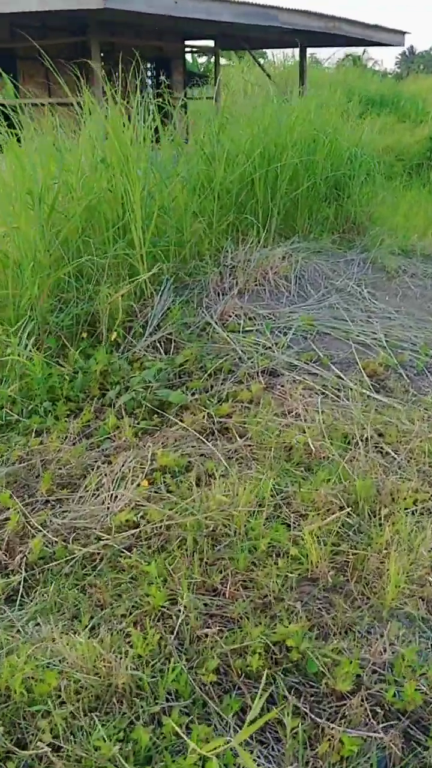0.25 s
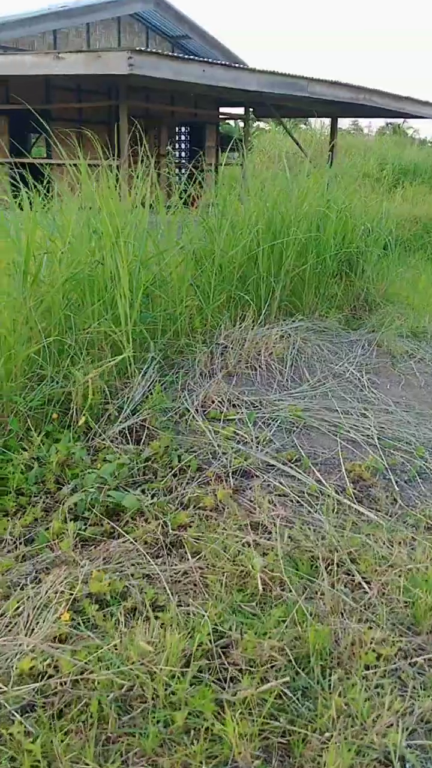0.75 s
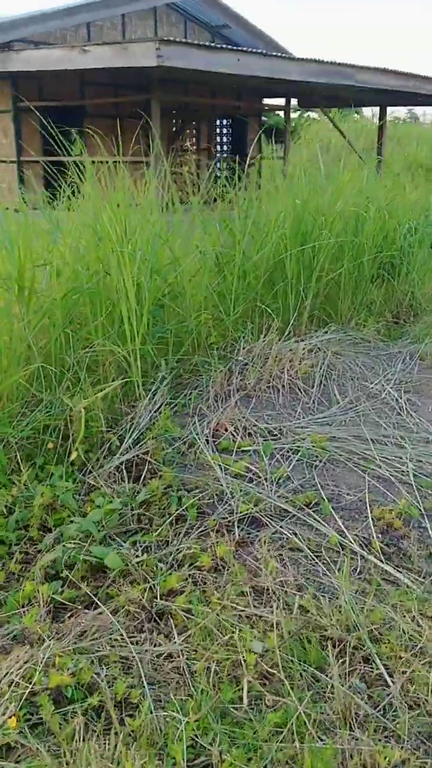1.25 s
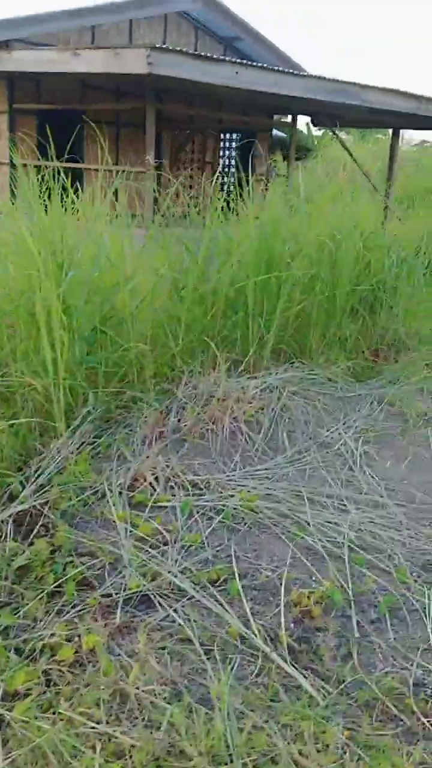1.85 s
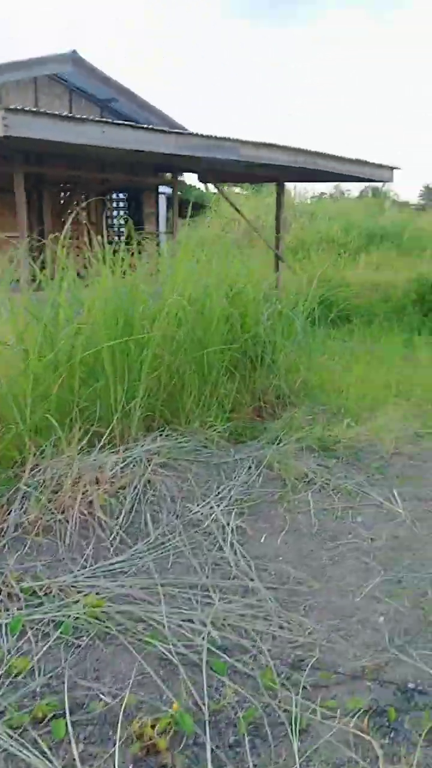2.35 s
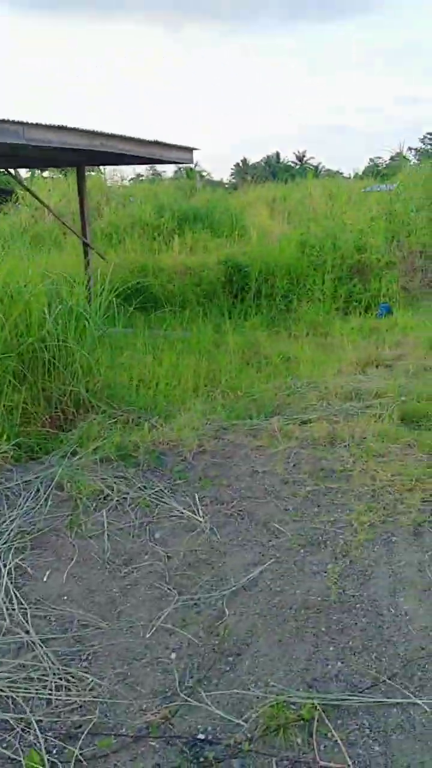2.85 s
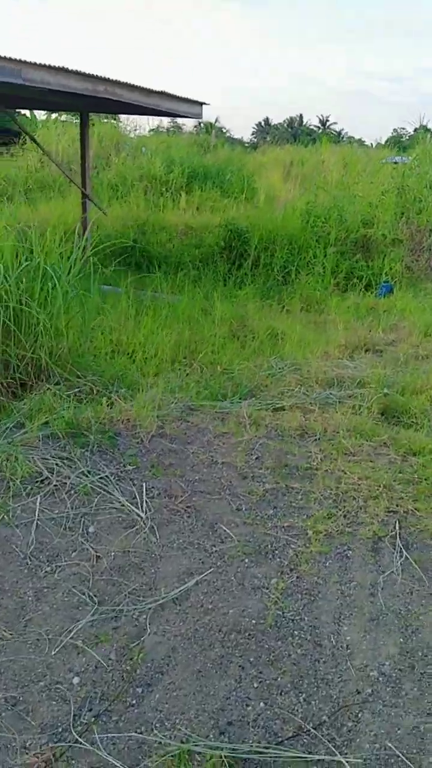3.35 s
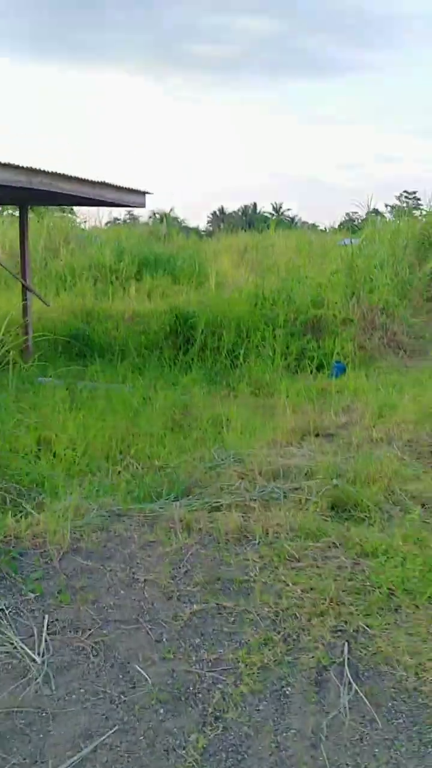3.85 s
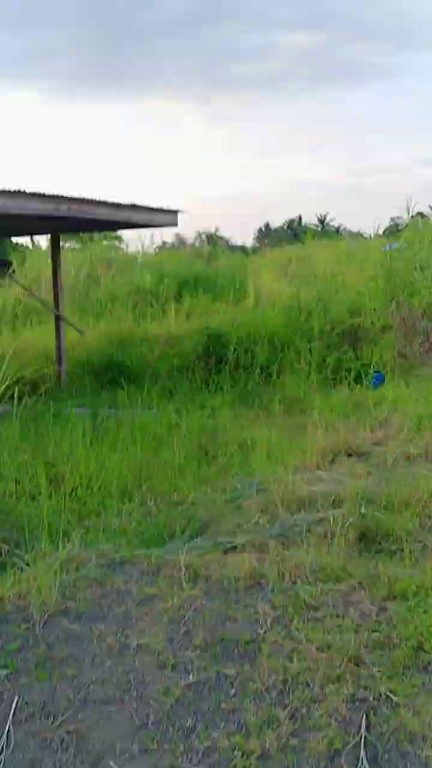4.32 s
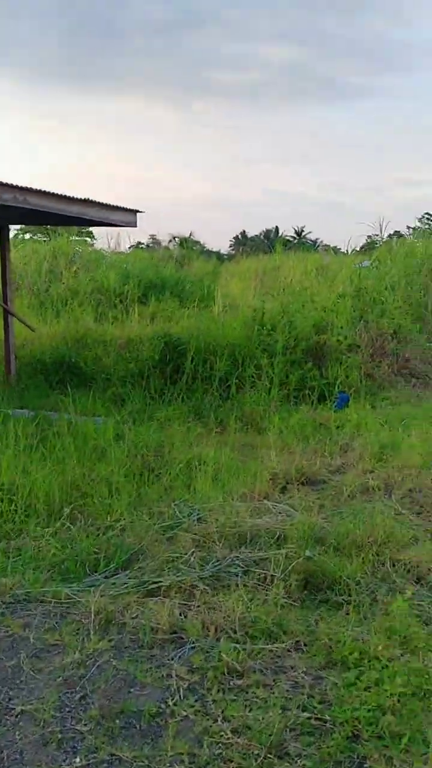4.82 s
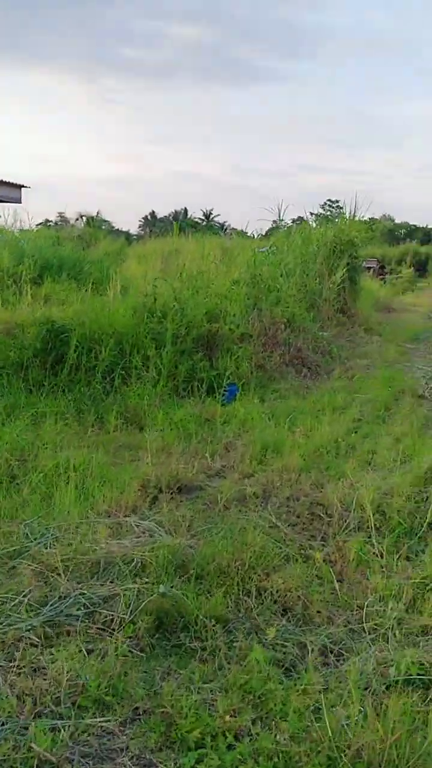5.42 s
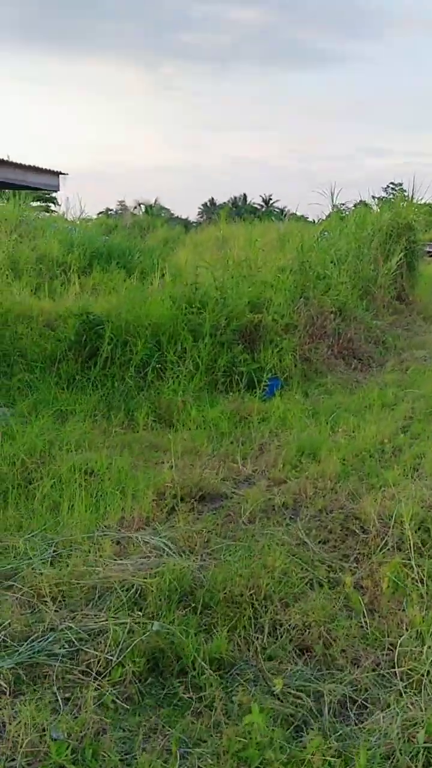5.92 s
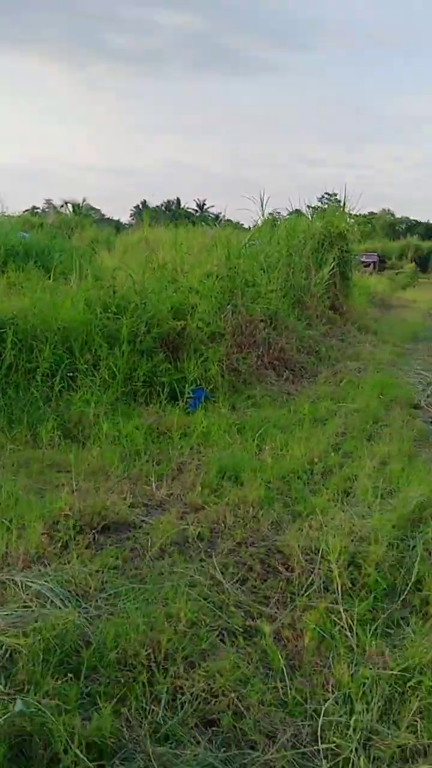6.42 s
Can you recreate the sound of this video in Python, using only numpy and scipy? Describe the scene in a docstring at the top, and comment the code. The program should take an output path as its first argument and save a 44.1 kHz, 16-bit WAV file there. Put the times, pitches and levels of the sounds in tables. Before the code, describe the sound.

Footsteps move through dry grass and over gravel throughout, with rustling, snapping stalks and occasional dull thumps on the handheld microphone. Behind them lie a soft country hush, a low rumble, faint insect trills and scattered bird whistles. At about 1.1 seconds a small bird gives a quick, husky chirp while a distant rooster crows until around 2 seconds. A heavier thump comes near 3 seconds. From 3.5 to 5.1 seconds a nearby rooster crows: two short syllables, a rough strained stretch, then a clear held note that sinks slightly. A second, higher rooster with more echo overlaps it until 4.9 seconds, as the stalks crack louder underfoot. Faint crows answer from far off between 5.2 and 5.8 seconds. One sharp click sounds right by the microphone at 5.5 seconds, and a chick peeps softly four times between 5.4 and 6.3 seconds as the steps continue.

```python
"""A grassy yard: a rooster crows, a second one overlaps it and others answer from far off.
Each crow is a buzz from the bird's voice box, made rough by strain and rasping air.
Someone walks through dry grass and over gravel with a phone: stalks crackle and snap, and
footfalls thump in the hand. Small birds whistle, a chick peeps and insects buzz with their wings
over a quiet country background."""
import sys
import numpy as np
from scipy import signal
from scipy.fft import rfft, irfft
from scipy.io import wavfile
from scipy.ndimage import uniform_filter1d

SR = 44100
rng = np.random.default_rng(int(sys.argv[2]) if len(sys.argv) > 2 else 0)


def waveform_to_disk(signal):
    """Save audio, clipped to [-1, 1], as 16-bit WAV at the path in sys.argv[1]."""
    frames = np.transpose(np.atleast_2d(signal))
    scaled = np.clip(frames, -1, 1) * 32767
    samples = np.round(scaled).astype(np.int16)
    wavfile.write(sys.argv[1], SR, samples)


N = 294147
T = np.arange(N) / SR

# Tone of air rasping through a strained throat: f/Hz, gain/dB
RASP_TONE = [(400, -28.5), (750, -10.5), (1000, -1.5), (1450, -9), (1750, 6), (2200, -2.5), (2700, -18.5),
             (3200, -0.5), (3550, -21), (4100, -33.5), (8000, -33.5)]
def crow(syllables, throat, jitter, shimmer, doubling, tremor, throb, flutter_hz, rasp_db):
    """The voice box buzzes; under strain its beats turn uneven and air rasps through."""
    voice, air = np.zeros(N), np.zeros(N)
    for start, hz, db, lift_db, rough in syllables:
        size, lift = len(hz), undb(lift_db)
        gain = edges(size, edge_s=0.012) * undb(db) / np.hypot(1, lift)
        # a hard-driven throat shakes a few dozen times a second, in pitch and in strength
        shake = np.sin(phase_of(38 * (1 + 0.21 * wander(19, size))))
        wobble = jitter * wander(flutter_hz, size) + tremor * shake
        phase = phase_of(hz * (1 + rough * wobble))
        overtones = sum(np.sin(k * phase) for k in range(2, 8))
        buzz = np.sqrt(2) * (np.sin(phase) + lift * overtones)
        # strong and weak beats take turns, adding blurred tones between the overtones
        alternation = doubling * rough ** 2 * wander(116, size) * np.sin(phase / 2)
        swell = 1 + rough * (shimmer * wander(flutter_hz, size) + throb * shake) + alternation
        add(voice, start, gain * swell * buzz)
        puffs = rng.standard_normal(size) * (1 + 0.7 * np.cos(phase))
        add(air, start, gain * lift * undb(rasp_db) * rough ** 1.56 * puffs)
    return colour(voice, throat) + colour(air, RASP_TONE)


# Short syllables: start t/s, crest t/s, end t/s, start f/Hz, crest f/Hz, end f/Hz, level/dB,
# overtone lift from the open beak/dB, roughness/0-1
NEAR_SYLLABLES = [(3.505, 3.58, 3.64, 690, 832.6, 814, -32, 5, 0.7),
                  (3.75, 3.806, 3.876, 810, 1000, 770, -25, 1, .22),
                  (4.35, 4.58, 4.63, 862, 861, 800, -40, 28, 0.44)]
# The long strained syllable and the clear last note: t/s, f/Hz, level/dB
STRAINED_CURVE = [(3.92, 707, -41), (3.95, 746, -39), (3.976, 876.1, -38), (4.086, 897, -27.5),
                  (4.136, 946, -27.5), (4.174, 952.9, -27), (4.272, 861, -29.5), (4.304, 864, -35),
                  (4.34, 799.1, -29)]
HELD_CURVE = [(4.62, 841.3, -32.5), (4.692, 820, -27.5), (4.822, 817, -29), (5.066, 799, -33),
              (5.115, 769.6, -39.5)]
# How the throat and the trip through the air shape the tone: f/Hz, gain/dB
THROAT_TONE = [(300, -15), (600, -40), (720, 2), (1200, -3), (1400, 2.5), (1620, 0.5), (1980, -0.5),
               (2200, -9.5), (2450, -21.5), (2900, -17.5), (3350, -23.5), (3800, -36), (5000, -56),
               (8000, -70)]
def near_rooster():
    """A close crow: short syllables, a strained stretch and a clear held note."""
    syllables = syllables_of(NEAR_SYLLABLES, bend=1.796, sag_db=14)
    syllables.append(long_syllable(STRAINED_CURVE, lift_db=2.5, rough=0.43))
    syllables.append(long_syllable(HELD_CURVE, lift_db=17, rough=0.06))
    voice = crow(syllables, THROAT_TONE, jitter=0.059, shimmer=0.29, doubling=0.41,
                 tremor=0.04, throb=0.76, flutter_hz=400, rasp_db=10)
    return outdoors(voice, wet_db=-15, t60=0.25)


# The second rooster's syllables: columns as in NEAR_SYLLABLES
SECOND_SYLLABLES = [(3.53, 3.6, 3.9, 1160, 1195, 1085, -38, 3, 0.38),
                    (3.85, 3.89, 4.21, 1100, 1133, 1290, -35.5, 6.5, 0.32),
                    (4.2, 4.3, 4.33, 1020, 1141, 1181, -32, -3, 0.33),
                    (4.43, 4.54, 4.64, 1185, 1189, 1118, -38, 2, 0.39),
                    (4.63, 4.83, 4.9, 1085, 1100, 1050, -37.5, 4.5, 0.082)]
def second_rooster():
    """A higher crow with more echo, overlapping the first."""
    syllables = syllables_of(SECOND_SYLLABLES, bend=1.43, sag_db=7)
    voice = crow(syllables, THROAT_TONE, jitter=0.058, shimmer=1.0, doubling=0.28,
                 tremor=0.012, throb=0.25, flutter_hz=230, rasp_db=21)
    return outdoors(voice, wet_db=-4.5, t60=0.43)


# The far roosters' syllables: columns as in NEAR_SYLLABLES
FAR_SYLLABLES = [(1.13, 1.26, 1.453, 839, 857, 1016, -42, 12, .12),
                 (1.44, 1.46, 1.485, 790, 845, 870, -42, 14, .3),
                 (1.47, 1.5, 1.62, 815, 840, 965, -49, 9, .2),
                 (1.6, 1.72, 1.915, 886, 803, 796, -53.5, -20, 0.24),
                 (2.25, 2.36, 2.55, 855, 828, 814, -58, -4, .2),
                 (5.15, 5.22, 5.3, 795, 846, 860, -57.5, -4, 0.28),
                 (5.46, 5.74, 5.75, 1017, 1195, 1241, -54.5, -1, 0.32)]
# How their throats and the long trip shape the tone: f/Hz, gain/dB
FAR_TONE = [(300, -59), (600, -6), (780, 0.5), (1300, 4.5), (1750, -1.5), (2150, -16.5), (2600, 3),
            (2900, -17), (3400, -79), (5000, -27), (8000, -73)]
def far_roosters():
    """Faint, hoarse crows from far off."""
    syllables = syllables_of(FAR_SYLLABLES, bend=1.4, sag_db=2.5)
    voice = crow(syllables, FAR_TONE, jitter=0.048, shimmer=1.0, doubling=0.83,
                 tremor=0.0073, throb=0.94, flutter_hz=250, rasp_db=27.5)
    return outdoors(voice, wet_db=-9, t60=0.35)


# Tone of dry stalks: f/Hz, gain/dB
STALK_TONE = [(180, -42), (300, -9), (527, -9.5), (1090, 0.5), (1360, 1), (1770, 1.5), (2120, -4),
              (2960, 2), (4190, -18), (5290, -9), (6240, -15.5), (8270, -9), (9770, -23.5), (15000, -8.5),
              (15800, -26)]
def stalk_sound(push, bright_push):
    """Breaks make dry stalks ring; the treble gets a push of its own."""
    low = signal.sosfilt(signal.butter(2, 5000, fs=SR, output="sos"), push)
    high = signal.sosfilt(signal.butter(2, 5000, "high", fs=SR, output="sos"), bright_push)
    return colour(low - high, STALK_TONE)


# Steps in the grass: t/s, landing crunch/dB, brushing/dB, treble/dB, ticking/dB
FOOTSTEPS = [(.4, -70, -49.5, -19, -66), (0.917, -38, -57, 7.5, -58.5), (1.678, -65, -44, -8, -53.5),
             (2.142, -46, -51.5, 0.5, -68), (2.243, -32, -48, -1, -79), (2.941, -37, -49, -2.5, -82),
             (3.13, -45.5, -50.5, -33, -85), (3.701, -31.5, -59, -2.5, -69),
             (4.351, -29.5, -38.5, -13.5, -57), (4.962, -66, -41.5, 1, -55), (5.648, -68, -48.5, -1.5, -54),
             (6.211, -42.5, -72, -6, -53.5)]
def grass():
    """Each foot brushes through the grass and lands, breaking a swarm of tiny fibres."""
    swell, bright = np.zeros(N), np.zeros(N)
    tufts = undb(3.3 * wander(28))  # the foot meets the grass unevenly
    for s, crunch_db, brush_db, treble_db, _ in FOOTSTEPS:
        crunch = undb(crunch_db) * surge(s, rise_s=0.021, fall_s=0.03)
        brush = undb(brush_db) * surge(s, rise_s=0.18, fall_s=0.16) * tufts
        swell += crunch + brush
        bright += (crunch + brush) * undb(treble_db)
    tap = signal.unit_impulse(2048)
    fibres = unit(crackle(per_s=2600, spread_db=4, cap=4)) / np.linalg.norm(stalk_sound(tap, tap))
    return stalk_sound(fibres * swell, fibres * bright)


# The loudest snaps: t/s, peak level/dB, treble/dB
LOUD_SNAPS = [(.958, -31.5, 0), (1.001, -28.5, 1), (1.363, -27, -21), (1.69, -23.5, -6), (2.072, -38, 2),
              (2.101, -34, -15), (2.239, -20, -11), (2.248, -25.5, -13), (2.638, -35, -22),
              (2.943, -20.5, -20), (2.986, -31.5, -29), (3.02, -23, -29), (3.331, -36, -8),
              (3.782, -24.5, -2), (3.939, -17.5, -7), (4.084, -28.5, 6), (4.208, -25, 0),
              (4.337, -16.5, -17), (4.548, -27.5, 0), (4.853, -22.5, -5), (4.913, -21.5, 1),
              (4.967, -23.5, -1), (5.65, -27.5, 21), (5.699, -32, 21), (5.772, -30, 16), (6.198, -29, -12)]
def snaps():
    """Single stalks and pebbles give a short, sharp crack."""
    out, t = np.zeros(N), T[:2048]
    for s, db, treble_db in LOUD_SNAPS:
        crack = rng.standard_normal(len(t)) * fade(t, 0.0042)
        snap = stalk_sound(crack, crack * undb(treble_db))
        add(out, s, undb(db) * snap / np.abs(snap).max())
    return out


def ticking():
    """Blades of grass spring back around each step with tiny, very bright ticks."""
    flicks, t = crackle(per_s=160, spread_db=4.5, cap=3.5), T[:SR // 50]
    ticks = signal.fftconvolve(flicks, rng.standard_normal(len(t)) * fade(t, 0.009))[:N]
    ticks = colour(ticks, [(500, -26), (3000, -10), (4200, -22), (6000, -17),
                           (10000, -13), (13000, -2), (15500, 0)])
    swell = sum(undb(db) * surge(s, rise_s=0.76, fall_s=0.33) for s, *_, db in FOOTSTEPS)
    return unit(ticks) * undb(3.6 * wander(9.7)) * swell


# The tones in one click: f/Hz, relative level/dB, ring time/s
CLICK_TONES = [(1360, -5.5, 0.0059), (2667, 6.5, 0.0043), (3040, 2.5, 0.0076), (5540, 2, 0.0031),
               (7770, -14, 0.011)]
def click():
    """A small hard contact right by the phone rings for a few milliseconds."""
    out, t = np.zeros(N), T[:SR // 20]
    ring = sum(undb(db) * np.sin(2 * np.pi * hz * t) * fade(t, t60) for hz, db, t60 in CLICK_TONES)
    ring *= np.minimum(t / 0.00044, 1)
    add(out, 5.5417, undb(-7.5) * ring / np.abs(ring).max())
    return outdoors(out, wet_db=-18, t60=0.38)


# Footfalls felt in the hand: t/s, thump level/dB, ring time/s, knock against thump/dB
FOOTFALLS = [(0.504, -22.5, 0.089, -48), (0.761, -28.5, 0.053, -40), (2.369, -36, 0.13, -31),
             (2.699, -33, 0.1, -26), (3.069, -17, 0.068, -14), (3.122, -31.5, 0.5, -7.5),
             (3.506, -40.5, 0.14, -0.5), (4.171, -35, 0.27, -32), (4.273, -32, 0.18, -37),
             (4.751, -25, 0.11, -14), (6.294, -52.5, 0.049, 3.5), (6.619, -32, 0.22, -41)]
# Low tones of the hand-held phone: f/Hz, relative level/dB, share of the ring time/0-1
BODY_TONES = [(89, 11, 0.56), (118.6, 5.5, 1), (176.3, -1, 0.83)]
def thumps():
    """Footfalls shake the hand and the phone: a low ring with a dull knock."""
    out, t = np.zeros(N), T[:SR // 2]
    knock_tone = [(100, -5.5), (380, -2.5), (650, -19), (1000, -7), (1600, -32), (5000, -50)]
    for s, db, ring_s, knock_db in FOOTFALLS:
        body = sum(undb(tone_db) * np.sin(2 * np.pi * hz * t) * fade(t, ring_s * share)
                   for hz, tone_db, share in BODY_TONES)
        body *= np.minimum(t / 0.014, 1) ** 2
        knock = unit(colour(rng.standard_normal(len(t)), knock_tone))
        knock *= undb(knock_db) * np.minimum(t / 0.0039, 1) * fade(t, 0.19)
        add(out, s, undb(db) * (body / np.abs(body).max() + knock))
    return out


# Notes of a scolding call and a thin "tsip", timed from the highest note:
# start t/s, crest t/s, end t/s, start f/Hz, crest f/Hz, end f/Hz, level/dB
SCOLD_SHAPE = [(-.043, -.025, -.012, 3700, 3200, 2700, -9), (-.018, 0, .011, 2900, 5300, 3700, -5),
               (.008, .017, .035, 3600, 4050, 2650, 1), (.031, .052, .083, 2400, 3020, 2550, -1)]
TSIP_SHAPE = [(-.02, 0, 0.016, 4250, 5390, 5120, 0.81), (0.033, 0.046, 0.068, 3630, 3990, 4300, -3.7)]
# One rising whistle over the first scold: same columns, timed from the start of the scene
RISING_NOTE = (1.168, 1.192, 1.226, 2700, 3560, 4400, -25)
# When each call comes: t/s, level/dB
SCOLD_TIMES = [(1.142, -29), (4.302, -36)]
TSIP_TIMES = [(1.603, -43), (2.903, -46), (4.603, -50.5)]
def near_bird():
    """Quick whistled chirps, husky where the pitch slides fastest."""
    tone, husk = np.zeros(N), np.zeros(N)
    notes = calls(SCOLD_TIMES, SCOLD_SHAPE, bend=1.5, sag_db=2.5)
    notes += calls(TSIP_TIMES, TSIP_SHAPE, bend=1.33, sag_db=6)
    notes.append(arch(RISING_NOTE, bend=0.99, sag_db=28))
    for start, hz, db in notes:
        gate = edges(len(hz), edge_s=0.005)
        add(tone, start, whistle(gate, hz, db, waver=0.025, overtone_db=-28))
        slide = uniform_filter1d(np.abs(np.gradient(np.log(hz))) * SR, SR // 60)
        huskiness = undb(db - 4) * np.minimum(slide / 60, 1)
        add(husk, start, gate * huskiness * rng.standard_normal(len(db)))
    husk = colour(husk, [(1500, 2), (2600, 17.5), (3300, 25), (4300, 8),
                         (5300, 11.5), (7000, -5), (12000, -4.5), (15000, -27)])
    return outdoors(tone + husk, wet_db=-20, t60=0.17)


# Sliding calls: t/s, length/s, start f/Hz, end f/Hz, level/dB
SLIDING_CALLS = [(.01, 0.06, 2894, 2310, -41.5), (0.286, 0.046, 2590, 2056, -48.5),
                 (0.591, 0.052, 4220, 2190, -48.5), (.924, .041, 1253, 963, -46.5),
                 (1.296, 0.049, 5170, 4500, -59), (1.34, 0.043, 4480, 5370, -58),
                 (1.96, 0.061, 3950, 2690, -49.5), (3.172, 0.063, 4170, 2570, -55),
                 (5.348, 0.064, 2440, 2690, -54.5), (5.795, 0.043, 2160, 2310, -44.5),
                 (6.005, 0.035, 2540, 1770, -43.5), (6.457, 0.042, 2400, 1950, -58),
                 (6.501, 0.033, 1426, 1275, -52.5)]
def sliding_birds():
    """Blurred whistles from further off, most of them falling."""
    out = np.zeros(N)
    for s, length, first_hz, last_hz, db in SLIDING_CALLS:
        progress = np.linspace(0, 1, int(length * SR))
        hz = first_hz + (last_hz - first_hz) * progress
        add(out, s, whistle(np.sin(np.pi * progress), hz, db, waver=0.056, overtone_db=-29))
    return outdoors(out, wet_db=-7.5, t60=0.072)


# The one note of a peep: columns as in SCOLD_SHAPE, timed from its start
PEEP_SHAPE = [(0, .028, .11, 3440, 3590, 2850, 0)]
# When the chick peeps: t/s, level/dB
PEEP_TIMES = [(-.02, -46.5), (5.415, -50), (5.661, -47.5), (5.922, -48), (6.187, -47)]
def chick():
    """Peeps that rise and fall, never quite alike, with a faint tone an octave below."""
    out = np.zeros(N)
    for s, hz, db in calls(PEEP_TIMES, PEEP_SHAPE, bend=1.9, sag_db=-1.5):
        gate = edges(len(hz), edge_s=0.0058)
        hz = hz * (1 + 0.008 * wander(40, len(hz)))
        db = db + 2 * wander(60.5, len(hz))
        add(out, s, whistle(gate, hz, db, waver=0.0094, overtone_db=-32))
        add(out, s, whistle(gate, hz / 2, db - 14, waver=0.01, overtone_db=-40))
    return outdoors(out, wet_db=-8.5, t60=0.78)


def distant_birds(count=14, length_s=0.081, middle_hz=2486):
    """Faint whistles glide up or down at random moments, blurred by distance."""
    out, progress = np.zeros(N), np.linspace(0, 1, int(length_s * SR))
    for when, pitch, glide in rng.random((count, 3)):
        hz = middle_hz * 2 ** (0.6 * (pitch - 0.5) + 0.382 * (glide - 0.5) * progress)
        call = whistle(np.sin(np.pi * progress), hz, db=-55, waver=0.017, overtone_db=-29)
        add(out, when * N / SR, call)
    return outdoors(out, wet_db=-3, t60=0.2)


# How the rumble swells and sinks: t/s, relative level/dB
RUMBLE_LEVELS = [(0, -48), (.8, -44.5), (1.25, -51.5), (1.9, -55.5), (2.28, -51.5), (2.9, -54),
                 (4.25, -53.5), (4.9, -52), (5.2, -53.5), (6.35, -61), (6.67, -44)]
# Its tone: f/Hz, gain/dB
RUMBLE_TONE = [(25, -8), (45, -47), (70, -13), (100, -1.5), (135, -1), (200, -8), (300, -19.5),
               (600, -46.5), (1500, -65)]
def rumble():
    """The hand and the moving air make a soft rumble on the microphone."""
    noise = unit(colour(rng.standard_normal(N), RUMBLE_TONE))
    db = np.interp(T, *np.transpose(RUMBLE_LEVELS)) + 1
    return noise * undb(db + 2.95 * wander(24))


# Insect choruses: f/Hz, width/Hz, level/dB, throb rate/Hz, throb depth/0-1
CHORUSES = [(7620, 670, -71.5, 15, 0.76), (8200, 480, -68.5, 5.5, 0.17), (11320, 880, -68.5, 100, 0)]
def insect_choruses():
    """Many tiny wing strokes blur into narrow bands of throbbing hiss."""
    out = np.zeros(N)
    for hz, width, db, rate, depth in CHORUSES:
        throb = 1 + depth * np.sin(phase_of(rate * (1 + 0.098 * wander(25))))
        soften = signal.butter(2, width / 2, fs=SR, output="sos")
        blur = signal.sosfilt(soften, rng.standard_normal(N) + 1j * rng.standard_normal(N))
        hiss = unit(np.real(blur * np.exp(2j * np.pi * hz * T)))  # moved up to the insects' pitch
        out += hiss * throb * undb(db + 1.5 * wander(4))
    return out


# Spells of trilling (silent if the end comes before the start): start t/s, end t/s
TRILL_SPELLS = [(.14, 0.62), (.9, 1.6), (2.1, 2.7), (3.7, 4.7), (5.102, 5.82), (6.4, 5.9)]
def insect_trill():
    """One nearer insect: each wing stroke slows as it closes, so its tone falls."""
    gate = sum(np.clip(np.minimum(T - start, end - T) / 0.02, 0, 1) for start, end in TRILL_SPELLS)
    strokes_per_s = 36 * (1 + 0.023 * wander(3.4))
    stroke = (np.cumsum(strokes_per_s) / SR) % 1
    hz = 7050 - 330 * stroke
    return gate * whistle(np.sin(np.pi * stroke), hz, db=-66.5, waver=0.0152, overtone_db=-40)


# Tone of the countryside: f/Hz, gain/dB
COUNTRY_TONE = [(150, 7.5), (400, 0), (700, 1.5), (1200, 0), (1800, -2), (2500, 4.5), (3400, -5),
                (4200, -18.5), (6000, -17.5), (9800, -24), (13000, -38), (15700, -9)]
def countryside():
    """Distant leaves and birds blend into a soft wash."""
    return unit(colour(rng.standard_normal(N), COUNTRY_TONE)) * undb(-55 + 0.09 * wander(6.7))


def outdoors(x, wet_db, t60):
    """Bushes and house walls scatter a short echo, wet_db louder than the sound itself."""
    t = T[:SR // 2]
    tail = rng.standard_normal(len(t)) * fade(t, t60) * np.minimum(t / 0.025, 1)
    return x + undb(wet_db) * signal.fftconvolve(x, tail / np.linalg.norm(tail))[:N]


def whistle(gate, hz, db, waver, overtone_db):
    """A nearly pure, slightly unsteady tone."""
    phase = phase_of(hz * (1 + waver * wander(895, len(hz))))
    return np.sqrt(2) * gate * undb(db) * (np.sin(phase) + undb(overtone_db) * np.sin(2 * phase))


def crackle(per_s, spread_db, cap):
    """Tiny pops at random moments, most weak and a few strong."""
    sizes = undb(spread_db * np.minimum(rng.exponential(size=N), cap))
    return sizes * rng.choice([-1, 1], N) * (rng.random(N) < per_s / SR)


def arch(note, bend, sag_db):
    """A note with one crest of effort: away from it the pitch bends and the level drops by sag_db."""
    start, crest, end, start_hz, crest_hz, end_hz, db = note
    t = np.arange(start, max(end, start + 0.005), 1 / SR)
    slack = np.interp(t, np.sort([start, crest, end]), [1, 0, 1])
    edge_hz = np.where(t < crest, start_hz, end_hz)
    return start, crest_hz + (edge_hz - crest_hz) * slack ** bend, db - sag_db * slack ** 2


def calls(times, notes, bend, sag_db):
    """The same arched notes, repeated at each time and level."""
    shapes = [arch(note, bend, sag_db) for note in notes]
    return [(s + start, hz, db + call_db) for s, call_db in times for start, hz, db in shapes]


def syllables_of(rows, bend, sag_db):
    """Arched crow syllables, each with its overtone lift and roughness."""
    return [(*arch(note, bend, sag_db), lift_db, rough) for *note, lift_db, rough in rows]


def long_syllable(curve, lift_db, rough):
    """A crow syllable whose pitch and level follow a curve."""
    s, hz, db = np.transpose(curve)
    t = np.arange(s[0], s[-1], 1 / SR)
    return s[0], np.interp(t, s, hz), np.interp(t, s, db), lift_db, rough


def colour(x, points):
    """Shape the tone of x along (f/Hz, gain/dB) points."""
    hz, db = np.transpose(points)
    size = 4096
    f = np.maximum(np.fft.rfftfreq(size, 1 / SR), 1)
    gain = undb(np.interp(np.log(f), np.log(hz), db))
    # make the filter ring only after a sound, never before it
    cepstrum = irfft(np.log(gain))
    cepstrum[1:size // 2] *= 2
    cepstrum[size // 2 + 1:] = 0
    return signal.fftconvolve(x, irfft(np.exp(rfft(cepstrum))))[:len(x)]


def wander(rate, size=N):
    """A random drift of about 1 either way that changes rate times a second."""
    place = np.arange(size) * rate / SR
    count = size // 4 + 2
    return unit(np.interp(place, np.arange(count), rng.standard_normal(count)))


def edges(size, edge_s):
    """Fade in, hold and fade out."""
    t = np.arange(size) / SR
    return np.sin(np.pi / 2 * np.clip(np.minimum(t, t[-1] - t) / edge_s, 0, 1))


def surge(s, rise_s, fall_s):
    """Climb to 1 at time s and die away, by 20 dB every rise_s or fall_s."""
    return undb(-20 * np.minimum(np.maximum((s - T) / rise_s, (T - s) / fall_s), 10))


def fade(t, t60):
    """Die away by 60 dB in t60 seconds."""
    return np.exp(-np.log(1000) * t / t60)


def phase_of(hz):
    """How far a wave has turned, in radians."""
    return 2 * np.pi * np.cumsum(hz) / SR


def undb(db):
    """Turn decibels into a plain gain."""
    return 10 ** (np.asarray(db) / 20)


def unit(x):
    """Scale to an average strength (rms) of 1."""
    return x / np.sqrt(np.mean(x ** 2) + 1e-18)


def add(out, s, x):
    """Mix x in at time s."""
    i = int(round(s * SR))
    x, i = x[max(-i, 0):], max(i, 0)
    out[i:i + len(x)] += x[:max(N - i, 0)]


def scene():
    """Roosters at three distances over the walker, the birds and the background."""
    roosters = near_rooster() + second_rooster() + far_roosters()
    walker = grass() + snaps() + ticking() + click() + thumps()
    birds = near_bird() + sliding_birds() + chick() + distant_birds()
    background = rumble() + insect_choruses() + insect_trill() + countryside()
    return (roosters + walker + birds + background)[None]


def record(dry):
    """The phone thins the deepest bass and cuts the highest treble."""
    thinned = signal.sosfilt(signal.butter(5, 68, "high", fs=SR, output="sos"), dry)
    return signal.sosfilt(signal.ellip(10, 0.2, 70, 15950, fs=SR, output="sos"), thinned)


dry = scene()
out = record(dry)
waveform_to_disk(out)
```